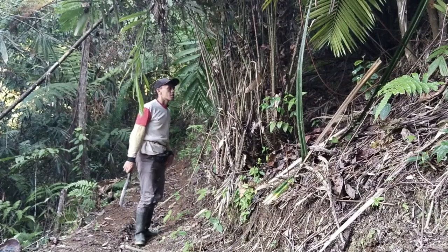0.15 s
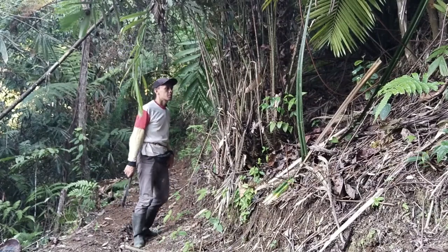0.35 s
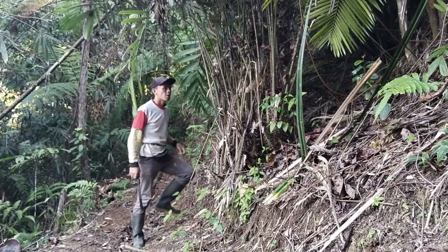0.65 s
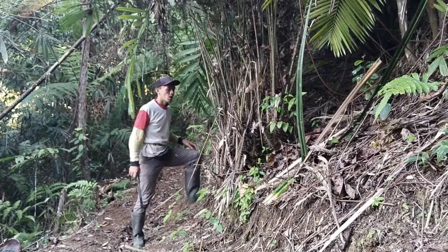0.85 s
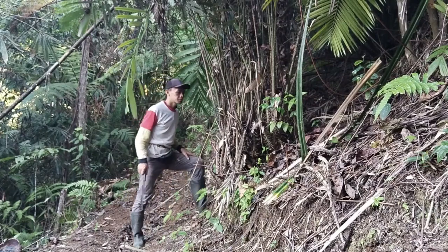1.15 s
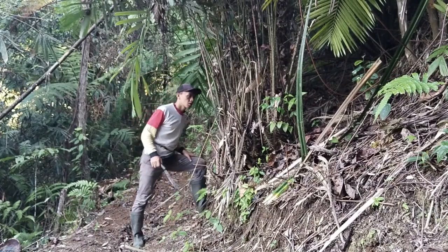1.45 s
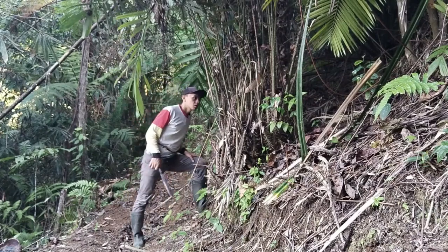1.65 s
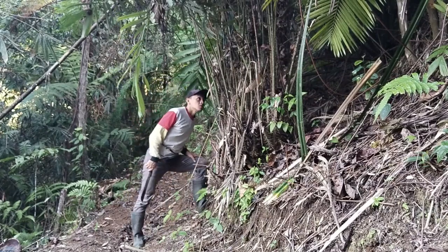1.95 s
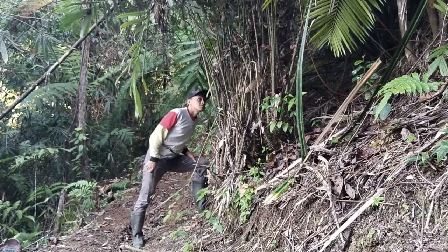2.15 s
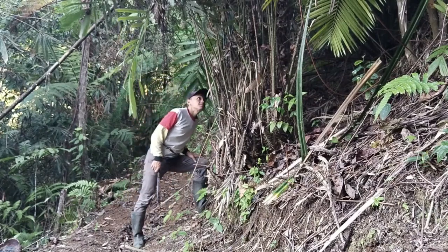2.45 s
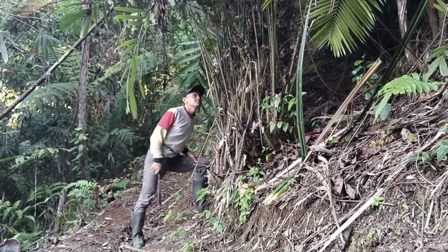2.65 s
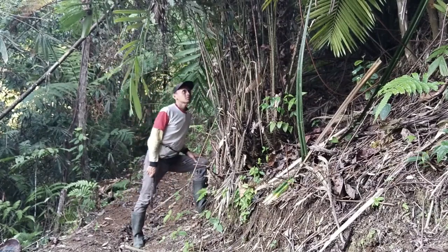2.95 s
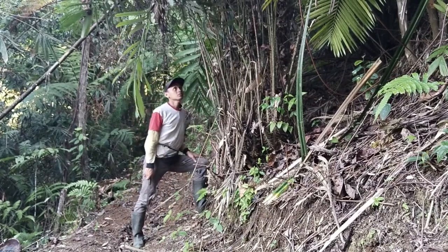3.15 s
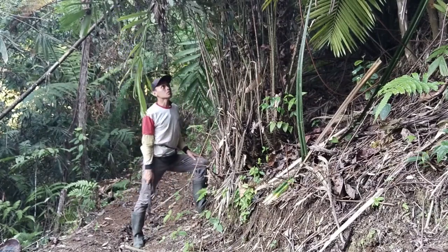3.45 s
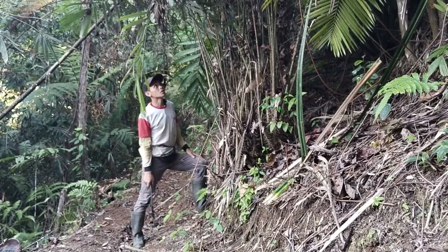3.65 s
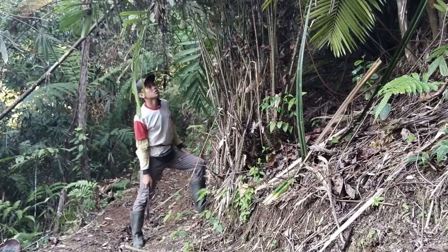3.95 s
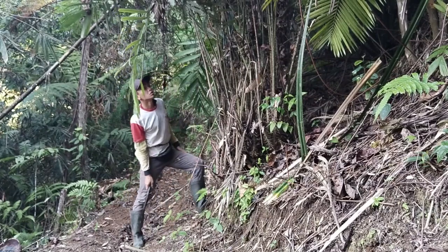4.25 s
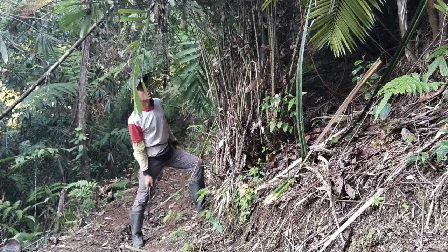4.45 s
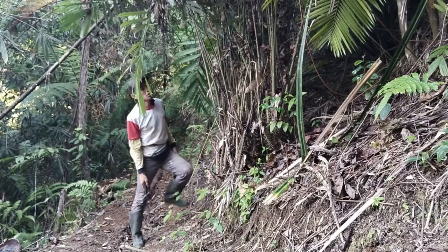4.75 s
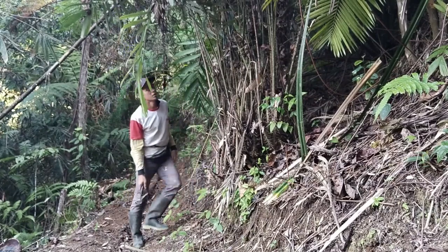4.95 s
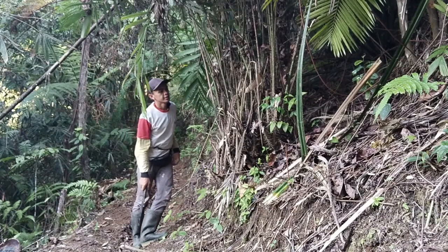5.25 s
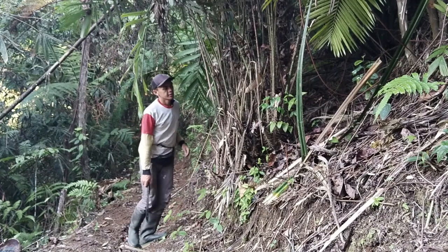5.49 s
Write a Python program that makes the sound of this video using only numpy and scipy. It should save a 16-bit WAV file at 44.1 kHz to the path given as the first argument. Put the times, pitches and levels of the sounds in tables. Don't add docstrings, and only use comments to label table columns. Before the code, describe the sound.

Boots crunch and snap dry leaves and twigs close by on a forest slope while a cicada repeatedly whistles and buzzes over faint insects.

```python
import sys
import numpy as np
from scipy import signal
from scipy.fft import rfft, irfft, next_fast_len
from scipy.io import wavfile
from scipy.ndimage import uniform_filter1d

SR = 44100
rng = np.random.default_rng(int(sys.argv[2]) if len(sys.argv) > 2 else 0)


def unload_audio(sound):
    columns = np.transpose(np.atleast_2d(sound))
    steps = np.round(np.clip(columns, -1, 1) * 32767)
    wavfile.write(sys.argv[1], SR, steps.astype(np.int16))


def volts_from_db(level):
    exponent = np.asarray(level, float) / 20
    return 10 ** exponent


N = 247842
T = np.arange(N) / SR
AFTER = T[:8192]

# start [t/s], whistle length [s], buzz length [s], whistle [level/dB], buzz [level/dB]
CALLS = [
    (-1.41, .5, .45, -48, -66),
    (.72, .5, .38, -45.5, -65.5),
    (2.793, .53, .47, -48, -62.5),
    (4.928, .51, .45, -47.5, -63.5),
]
# multiple [1], [level/dB]
WHISTLE_PARTIALS = [(17, -30), (19, -19), (21, 0), (23, -29)]
BUZZ_PARTIALS = [(17, -9), (19, 0), (21, -12), (23, -18)]
BUZZ_UPPER = [(32, -3), (36, 6), (40, 0), (42, -1), (43, -3), (44, -1), (45, 0), (47, -1), (49, -9),
              (53, -13), (57, -12)]
# loudest [t/s], crisp [level/dB], crunch against crisp [level/dB], rise [s], fall [s]
LEAVES = [(.033, -39, -16, .001, .022), (.235, -56, -11, .05, .05), (.303, -50, -14, .003, .04),
          (.343, -46, -7, .02, .03), (.46, -56, -6, .04, .07), (.55, -54, -2, .01, .04),
          (.62, -53, -15, .03, .04), (.672, -45, -8, .004, .026), (.99, -58, -12, .01, .04),
          (1.06, -53, -9, .04, .05), (1.097, -28, -12.5, .007, .05), (1.136, -28, -14, .02, .014),
          (1.21, -40, -18, .04, .035), (1.53, -59, -7, .14, .025), (1.722, -57, -7, .004, .02),
          (4.16, -64, -28, .01, .06), (4.583, -52, -26, .008, .04), (4.66, -45, -20, .035, .04),
          (4.745, -51, -15, .02, .065), (4.92, -66, -15, .06, .1), (5.197, -56, -12, .004, .05),
          (5.58, -54, -10, .05, .09)]
# [f/Hz], density [level/dB per Hz]
CRISP = [(2530, -44.5), (4300, -16.5), (5450, -15.5), (6070, -2), (6990, -6.5), (7950, 0), (9970, 0),
         (12300, -7.5), (14600, -8), (15600, -7)]
CRUNCH = [(410, -44), (700, -14.5), (1200, -16.5), (1460, -14), (1880, -13), (2910, -6), (3180, -3.5),
          (5000, -4), (6500, -38), (11000, -120)]
# [t/s], peak [level/dB], duller part against it [level/dB], left minus right [level/dB]
SNAPS = [(0.0325, -19.5, -22, 14), (0.3037, -38, -15, 1), (0.3414, -36, 1, -1.5), (0.5864, -42, -17, 0.5),
         (0.6684, -33, -8, -5), (0.9837, -36.5, -24, 0), (1.094, -26, -20, 2), (1.0994, -22, -15.5, -0.5),
         (1.1345, -6, -23, -1), (1.1474, -16, -20, -4), (1.2094, -26, -28, -1.5), (1.2286, -19, -34, -0.5),
         (1.267, -23, -31, -7), (1.4326, -29.5, -32, 1.5), (1.506, -36.5, -21, -0.5),
         (1.5264, -29.5, -32, -15), (1.6536, -41, -14, 0), (1.72, -28, -33, -7), (1.9155, -39, -14, -1),
         (2.6943, -43, -27, 0), (2.8659, -36.5, -35, -0.5), (3.0185, -38, -33, -1.5), (4.1545, -43, -23, 7),
         (4.1734, -31.5, -33, -7), (4.582, -28.5, -36, -12), (4.6104, -33, -26, -7), (4.6494, -35, -21, -3),
         (4.6682, -29, -26, -0.5), (5.1941, -38, -15, 0), (5.2584, -39, -27, -0.5)]
# [t/s], peak [level/dB], [f/Hz], t60 [s]
KNOCKS = [
    (0.6682, -42, 1512, 0.055),
    (1.0004, -53, 1620, 0.054),
    (1.0959, -43.5, 1430, 0.06),
    (1.1353, -36.5, 1488, 0.065),
]
# [t/s], peak [level/dB], centre [f/Hz], t60 [s]
THUMPS = [(0.03, -34, 454, 0.053), (0.98, -49, 358, 0.06), (1.091, -34.5, 550, 0.029),
          (1.102, -28, 211, 0.042), (1.114, -30.5, 294, 0.037), (3.199, -54.5, 202, 0.08),
          (3.598, -49, 205, 0.06), (4.747, -53, 390, 0.06), (4.979, -51, 402, 0.09),
          (5.099, -50, 215, 0.076), (5.192, -46, 482, 0.14), (5.208, -46, 282, 0.062),
          (5.589, -63, 200, 0.08)]
# loudest [t/s], [level/dB]
CRICKET_HIGH = [(.04, -64), (.25, -68), (.484, -65), (.692, -66), (1.05, -65), (1.3, -65), (1.52, -65),
                (1.73, -70), (2.29, -65), (2.64, -63), (2.92, -65), (3.6, -70), (3.83, -64), (4.12, -62),
                (4.3, -66), (4.64, -72), (4.92, -76), (5.09, -67), (5.33, -67), (5.57, -65)]
# start [t/s], length [s], [level/dB]
CRICKET_LOW = [
    (2.2, .55, -69),
    (3.5, .72, -72),
    (4.88, .9, -70.5),
]
# [t/s], [level/dB]
RASP = [
    (2.12, -85),
    (2.2, -57),
    (3.0, -57),
    (3.6, -60),
    (3.8, -85),
]
# [t/s], peak [level/dB], [f/Hz]
PIPS = [(0.8305, -65, 7010), (1.8562, -64, 6930), (2.0617, -63, 7010), (2.374, -63, 7010),
        (3.042, -60, 6990), (3.5927, -64, 7010), (3.9155, -64, 6920), (4.2607, -63, 6960),
        (4.3191, -67, 6980), (4.5401, -63, 6960), (5.0619, -63, 6950), (5.3994, -65, 7020)]
# [f/Hz], density [level/dB per Hz]
CHORUS_MID = [(3700, -56), (4150, -19), (4450, -6), (4900, -1.5), (5250, 1), (5550, -1), (5750, -8.5),
              (6500, -16.5), (7200, -27)]
CHORUS_HIGH = [(3940, -26), (6700, -4.5), (6770, -7.5), (7560, -1.5), (7830, -2.5), (8170, -6.5),
               (9080, -7), (10100, -3.5), (10400, -2), (11400, -18), (13000, -13), (14600, -13),
               (15600, -14)]
# [f/Hz], density [level/dB per Hz]
AIR = [(8.2, -30), (14, -5), (37, 4), (64, -6.5), (145, -13.5), (234, -16.5), (312, -26.5), (360, -29),
       (579, -32), (1190, -38), (1340, -44.5), (1700, -35), (2000, -40.5), (4200, -43.5), (5460, -77),
       (9240, -120)]
# [f/Hz], left minus right [level/dB]
AIR_BALANCE = [(60, 0.5), (110, 9), (200, -0.5), (380, 12.5), (700, 2.5), (1290, 10), (2380, 1),
               (4400, 4.5), (8120, -5.5), (15000, -6.5)]
# [t/s], [level/dB]
WIND = [(0.0, -52), (1.25, -52), (1.6, -53.5), (3.03, -54), (4.04, -53), (4.38, -55), (5.62, -53)]
# [t/s], [level/dB]
FLY = [
    (2.0, -81),
    (2.04, -62),
    (2.11, -52.5),
    (2.15, -83),
]

FOREST_T60_S, FOREST_DB = .4, -6
DRONE_HZ, DRONE_DB, DRONE_SWELL_DB_S = 1740, -74.5, 4.5
DRONE_PUSH_DB, DRONE_PUSH_S, PAUSE_S = 4, .06, .09
SLACK_HZ, CAUGHT_HZ, TAUT_HZ, JUMP_S, SETTLE_S = 1750, 2580, 2926, .047, .078
WHISTLE_ONSET_DB, WHISTLE_CATCH_S, WHISTLE_SWELL_DB_S, WHISTLE_FALL_S = -24, .055, 23, .1
WHISTLE_DIP_DB, WHISTLE_DIP_S, WHISTLE_DIP_WIDTH_S = -4, .25, .07
BEAD_DB, BEAD_FADE_S = 3, .15
CATCH_UNDERTONE_DB, CATCH_FADE_S = -5, .04
BUZZ_HZ, BUZZ_SAG_HZ, BUZZ_SAG_S = 2597, 45, .08
BUZZ_UPPER_DB, BUZZ_RISE_S, BUZZ_FALL_S = -9.5, .05, .06
TWIG_HZ, TWIG_SPREAD = 9600, .07
CRICKET_RISE_S, CRICKET_FALL_S = .07, .13
CHORUS_MID_DB, CHORUS_HIGH_DB, CHORUS_FADE_DB_S, CHORUS_SWELL_DB = -57, -61.5, 1.1, .8


def cicada():
    calls = np.array(CALLS)
    current = np.searchsorted(calls[:, 0], T) - 1
    s, whistle_s, buzz_s, whistle_db, buzz_db = calls[current].T
    ahead = np.append(calls[1:, 0], 9)[current] - T
    drone = cicada_drone(s, s + whistle_s + buzz_s, ahead)
    buzz = cicada_buzz(s + whistle_s, buzz_s, buzz_db)
    whistle = cicada_whistle(s, whistle_s, whistle_db)
    near = pan(whistle, 8, lag=4) + pan(drone, 2, lag=9) + pan(buzz, -1, lag=6)
    return volts_from_db(3.5) * (near + .95 * forest(drone + buzz + whistle))


def cicada_drone(s, end, ahead):
    drone_db = DRONE_DB - DRONE_SWELL_DB_S * ahead + DRONE_PUSH_DB * np.exp(-ahead / DRONE_PUSH_S)
    between = bout(end + PAUSE_S, 9, .08, 1) * volts_from_db(drone_db)
    into_call = bout(s, 0, 1e-4, .025) * volts_from_db(DRONE_DB + DRONE_PUSH_DB)
    tone = partials(DRONE_HZ + 9 * walk(120), [(1, 0)], lead=1, wobble_db=3.2)
    drone = (between + into_call) * volts_from_db(2.5) * tone
    octave = level(colour(rng.standard_normal(N), [(3300, -20), (3455, 0), (3600, -20)]), -16)
    return drone + octave * uniform_filter1d(np.abs(drone), size=4000)


def cicada_whistle(s, length, peak_db):
    t = T - s - JUMP_S
    jump = CAUGHT_HZ + t / JUMP_S * (CAUGHT_HZ - SLACK_HZ)
    settle = TAUT_HZ - (TAUT_HZ - CAUGHT_HZ) * np.exp(-t / SETTLE_S)
    hz = np.where(t < 0, jump, settle)
    shake_hz = 3 + .2 * np.clip(2750 - hz, 0, 600)
    hz = hz + shake_hz * walk(250)
    top = length - WHISTLE_FALL_S
    db = peak_db + WHISTLE_ONSET_DB * np.exp(-((T - s) / WHISTLE_CATCH_S) ** 2)
    db -= WHISTLE_SWELL_DB_S * np.maximum(s + top - T, 0)
    db += WHISTLE_DIP_DB * np.exp(-((T - s - WHISTLE_DIP_S) / WHISTLE_DIP_WIDTH_S) ** 2)
    db += BEAD_DB * np.exp((s - T) / BEAD_FADE_S) * walk(70)
    catch = volts_from_db(CATCH_UNDERTONE_DB) * np.exp(-np.abs(t) / CATCH_FADE_S)
    undertone = catch * partials(hz, [(19, 0)], lead=21, wobble_db=3.0)
    tone = partials(hz, WHISTLE_PARTIALS, lead=21, wobble_db=1.8)
    return bout(s, top, .012, WHISTLE_FALL_S) ** 2 * volts_from_db(db) * (tone + undertone)


def cicada_buzz(s, length, db):
    hz = BUZZ_HZ + BUZZ_SAG_HZ * np.exp(-np.maximum(T - s, 0) / BUZZ_SAG_S)
    loud = bout(s - BUZZ_RISE_S, length + BUZZ_RISE_S - BUZZ_FALL_S, BUZZ_RISE_S, BUZZ_FALL_S) * volts_from_db(db)
    body = volts_from_db(2.5) * partials(hz + 6 * walk(90), BUZZ_PARTIALS, lead=19, wobble_db=1.6)
    upper = volts_from_db(BUZZ_UPPER_DB) * partials(hz + 5 * walk(90), BUZZ_UPPER, lead=19, wobble_db=4.0)
    return loud * (body + upper)


def leaves():
    crack_db = np.minimum(4.0 * rng.exponential(size=N), 15)
    cracks = (rng.random(N) < 1600 / SR) * volts_from_db(crack_db)
    grain_level = (.45 + uniform_filter1d(cracks, size=16) * 3.0) * volts_from_db(1.6 * walk(35))
    grains = rng.standard_normal((3, N)) * grain_level
    wide = grains[0] + 1.8 * grains[1:]
    crisp, crunch = level(colour(wide, CRISP)), level(colour(wide, CRUNCH))
    out = crisp * sum(swell(s, db, rise, fall) for s, db, _, rise, fall in LEAVES)
    out += crunch * sum(swell(s, db + dull_db + 3.5, rise, fall) for s, db, dull_db, rise, fall in LEAVES)
    return out * volts_from_db(np.array([[-.8], [.8]]))


def footfalls():
    twigs = twig_snaps()
    knocks = sum(at(s, ring(db, hz, t60, rise=0.0015)) for s, db, hz, t60 in KNOCKS)
    thumps = sum(at(s, boot_thump(db, hz, t60)) for s, db, hz, t60 in THUMPS)
    return twigs + pan(knocks + thumps, 2.2) + 0.37 * forest(twigs.mean(0) + knocks + thumps)


def twig_snaps():
    out = np.zeros((2, N))
    for s, db, dull_db, pan_db in SNAPS:
        noise = rng.standard_normal((3, len(AFTER)))
        bright = level(colour(noise[0] + .9 * noise[1:], CRISP))
        dull = level(colour(noise[0], CRUNCH))
        burst = volts_from_db(db - 10) * (np.exp(-AFTER / 0.00073) + 0.11 * np.exp(-AFTER / .012))
        hz = TWIG_HZ * (1 + TWIG_SPREAD * rng.standard_normal())
        twig_ring = pan(ring(db - 7.5, hz, 0.0066, rise=.0001), pan_db)
        out += at(s, burst * (bright + volts_from_db(dull_db + 6) * dull) + twig_ring)
    return out


def boot_thump(db, hz, t60):
    spectrum = [(0.14 * hz, -18), (0.64 * hz, -3), (hz, 0), (1.21 * hz, -7), (4 * hz, -30)]
    soil = level(colour(rng.standard_normal(len(AFTER)), spectrum))
    envelope = (1 - np.exp(-AFTER / 0.0016)) * np.exp(-AFTER * np.log(1000) / t60)
    return volts_from_db(db - 4) * soil * envelope + ring(db - 2, hz, 0.046, rise=0.00033)


def crickets():
    strokes = .7 + .3 * np.sin(2 * np.pi * np.cumsum(24 * (1 + .1 * walk(3))) / SR)
    loud = np.max([swell(s, db, CRICKET_RISE_S, CRICKET_FALL_S) for s, db in CRICKET_HIGH], axis=0)
    high_tone = np.sin(2 * np.pi * np.cumsum(5590 + 9 * walk(12)) / SR)
    high = loud * volts_from_db(12.5 + 2.2 * walk(16)) * strokes * high_tone
    bouts = sum(volts_from_db(db) * bout(s, length, .07, .15) for s, length, db in CRICKET_LOW)
    low_tone = np.sin(2 * np.pi * np.cumsum(5475 + 8 * walk(9)) / SR)
    low = bouts * volts_from_db(8 + 3.5 * walk(14)) * low_tone
    rasp = katydid()
    pips = sum(at(s, ring(db + 11, hz, 0.091, rise=0.0097)) for s, db, hz in PIPS)
    near = pan(high, 6, lag=-10) + pan(low, 7, lag=-14) + pan(rasp, -9, lag=12) + pan(pips, 6, lag=-6)
    return near + forest(.7 * (high + low + rasp + pips))


def katydid():
    stroke = (T * 30.3) % 1
    scrape = np.exp(-((stroke - .4) / .13) ** 2) * rng.standard_normal(N)
    wing = [(4600, -25), (4950, -4), (5120, 0), (5300, -3), (5700, -25)]  # f/Hz, level/dB
    return volts_from_db(curve(RASP)) * level(colour(scrape, wing))


def chorus():
    mid = level(colour(rng.standard_normal((2, N)) * volts_from_db(1.0 * walk(40)), CHORUS_MID))
    high = level(colour(rng.standard_normal((2, N)) * volts_from_db(1.2 * walk(25)), CHORUS_HIGH))
    mid_db = CHORUS_MID_DB + CHORUS_SWELL_DB * walk(2)
    high_db = CHORUS_HIGH_DB - CHORUS_FADE_DB_S * T
    return volts_from_db(mid_db) * mid + volts_from_db(high_db) * high * volts_from_db(np.array([[-.5], [.5]]))


def air():
    hush = colour(rng.standard_normal((2, N)), AIR)
    left = colour(hush[0] + 0.23 * hush[1], [(hz, db / 2) for hz, db in [(10, 5.5)] + AIR_BALANCE])
    right = colour(hush[1], [(hz, -db / 2) for hz, db in [(10, 4)] + AIR_BALANCE])
    flutter = volts_from_db(np.array([1.2 * walk(9), 1.3 * walk(9.7)]))
    wind = volts_from_db(curve(WIND) + 4.5) * level(flutter * np.array([left, right]))
    fly = volts_from_db(curve(FLY)) * np.sin(2 * np.pi * 234 * T)
    return wind + pan(fly, 2.5)


def forest(x):
    t = T[:int(.6 * SR)]
    envelope = np.exp(-t * np.log(1000) / FOREST_T60_S) * np.minimum(t / 0.029, 1)
    tail = rng.standard_normal((2, len(t))) * envelope
    tail /= np.sqrt(np.sum(tail[0] ** 2))
    return volts_from_db(FOREST_DB) * signal.fftconvolve(x[None], tail, axes=1)[:, :N]


def partials(hz, table, lead, wobble_db):
    phase = 2 * np.pi * np.cumsum(hz / lead) / SR
    out = 0
    for multiple, db in table:
        flicker = volts_from_db(db + wobble_db * walk(30))
        out = out + np.sqrt(2) * flicker * np.sin(round(multiple) * phase + 7 * rng.random())
    return out


def ring(db, hz, t60, rise):
    envelope = (1 - np.exp(-AFTER / rise)) * np.exp(-AFTER * np.log(1000) / t60)
    return volts_from_db(db) * envelope * np.sin(2 * np.pi * hz * AFTER)


def swell(s, db, rise, fall):
    return volts_from_db(db) * np.exp(np.where(T < s, (T - s) / rise, (s - T) / fall))


def bout(s, length, rise, fall):
    return np.clip(np.minimum((T - s) / rise, (s + length - T) / fall + 1), 0, 1)


def at(s, sound):
    out, i = np.zeros(sound.shape[:-1] + (N + len(AFTER),)), int(s * SR)
    out[..., i:i + sound.shape[-1]] = sound
    return out[..., :N]


def pan(x, db, lag=0):
    return np.array([np.roll(x, lag) * volts_from_db(db / 2), x * volts_from_db(-db / 2)])


def level(x, db=0):
    return x * volts_from_db(db) / np.sqrt(np.mean(x ** 2))


def curve(rows):
    s, db = np.transpose(rows)
    return np.interp(T, s, db)


def colour(x, spectrum):
    hz, db = np.transpose(spectrum)
    size = next_fast_len(x.shape[-1])
    log_f = np.log(np.fft.rfftfreq(size, 1 / SR) + 1)
    gain = volts_from_db(np.interp(log_f, np.log(hz), db, -90, -90))
    return irfft(rfft(x, size) * gain, size)[..., :x.shape[-1]]


def walk(rate):
    k = int(SR / rate)
    steps = np.repeat(rng.standard_normal(N // k + 1), k)
    return level(uniform_filter1d(uniform_filter1d(steps, k), k)[:N])


def scene():
    return cicada() + leaves() + footfalls() + crickets() + chorus() + air()


def roll_off(x):
    return signal.sosfilt(signal.butter(12, 16490, fs=SR, output="sos"), x)


def record(dry):
    top_cut = signal.ellip(8, .2, 70, 15600, fs=SR, output="sos")
    mix = signal.sosfilt(top_cut, dry)
    return roll_off(mix)


dry = scene()
out = record(dry)
unload_audio(out)
```